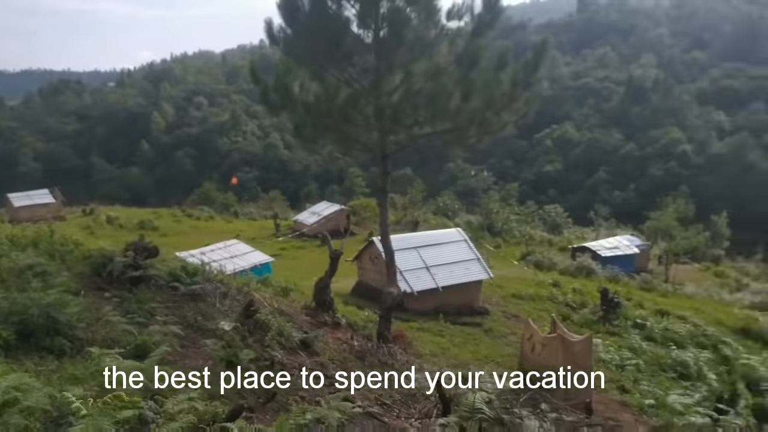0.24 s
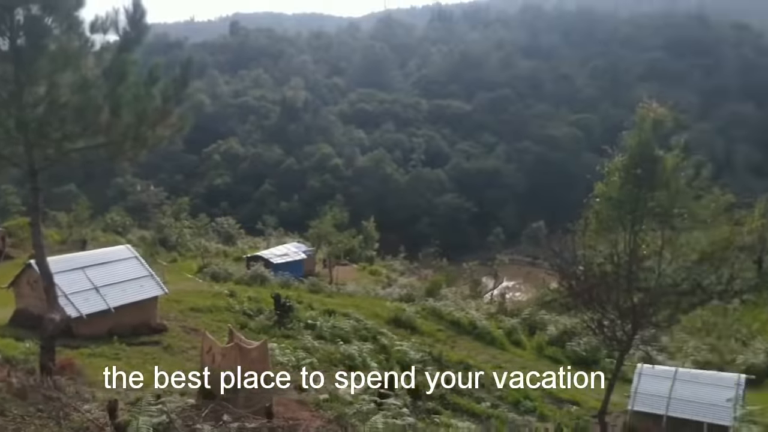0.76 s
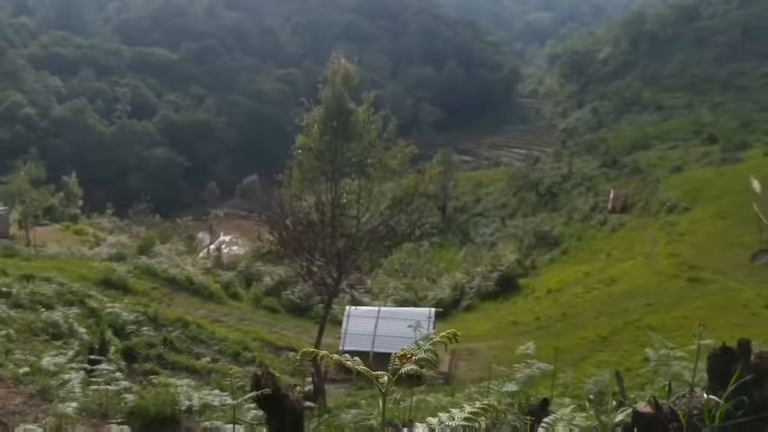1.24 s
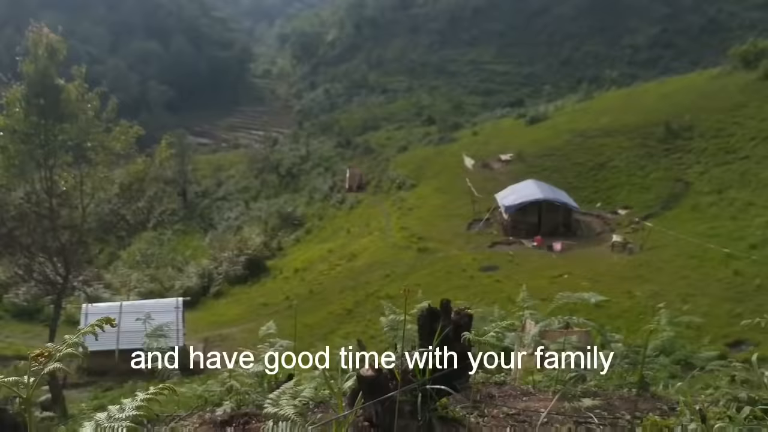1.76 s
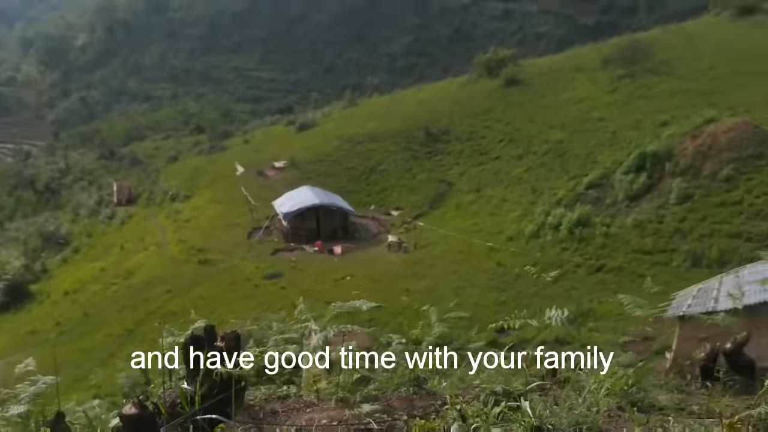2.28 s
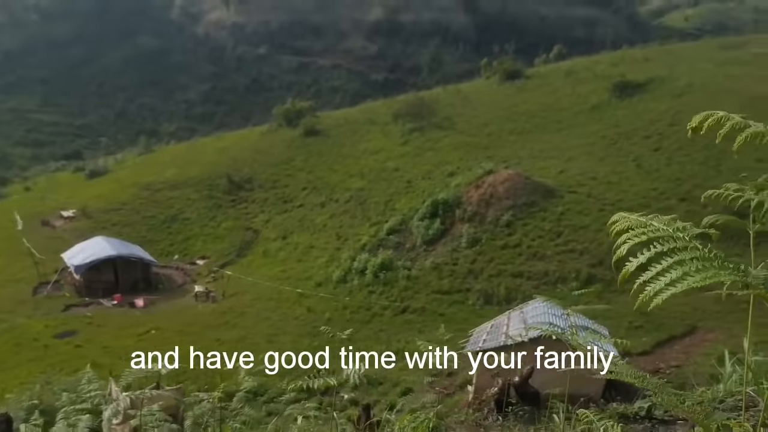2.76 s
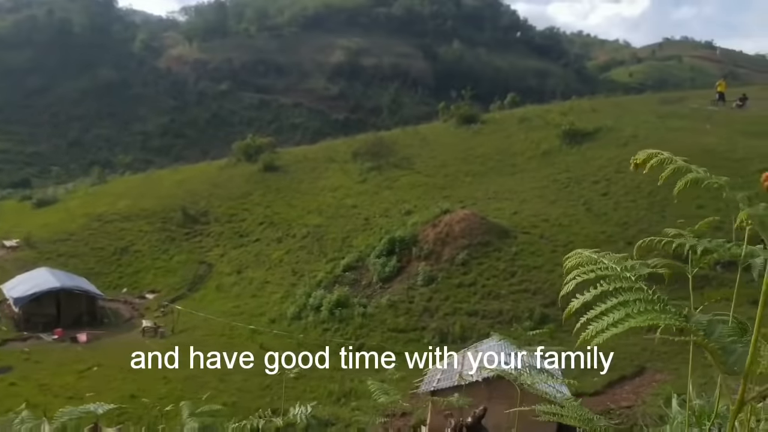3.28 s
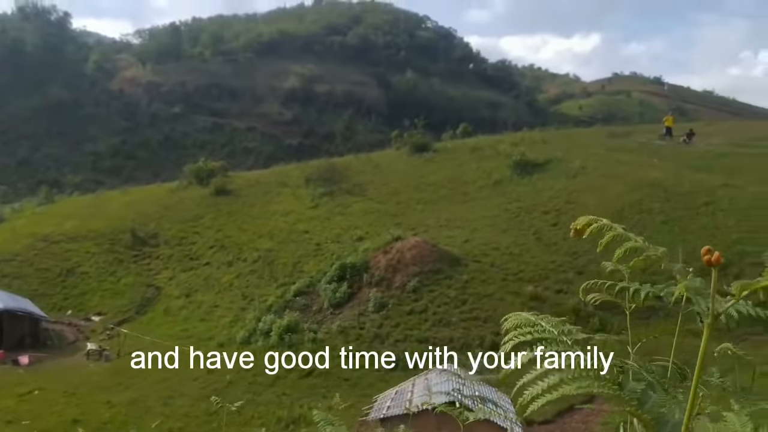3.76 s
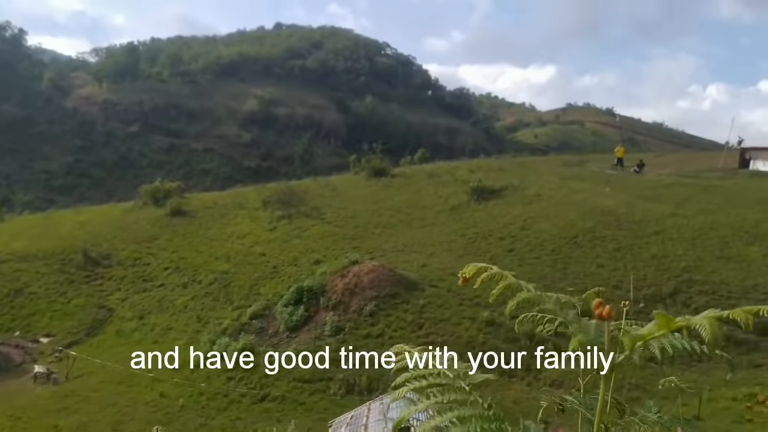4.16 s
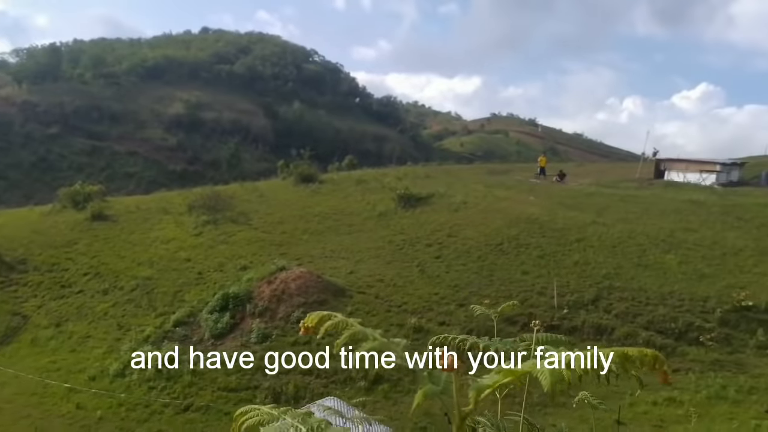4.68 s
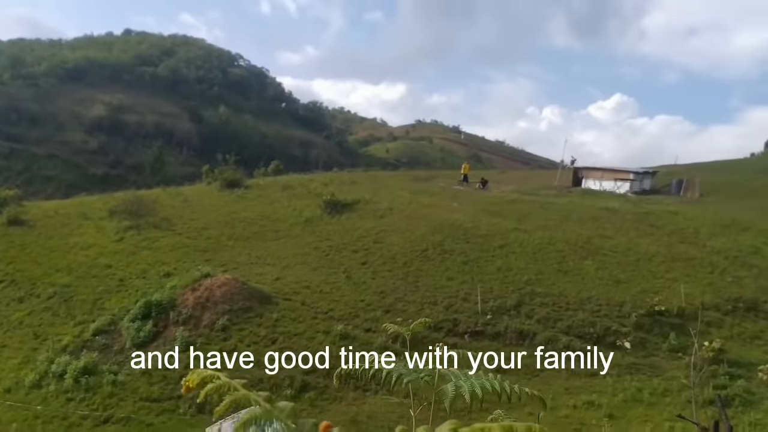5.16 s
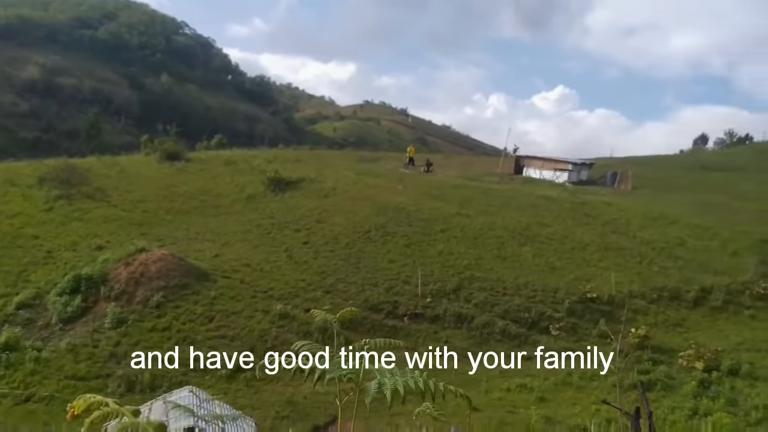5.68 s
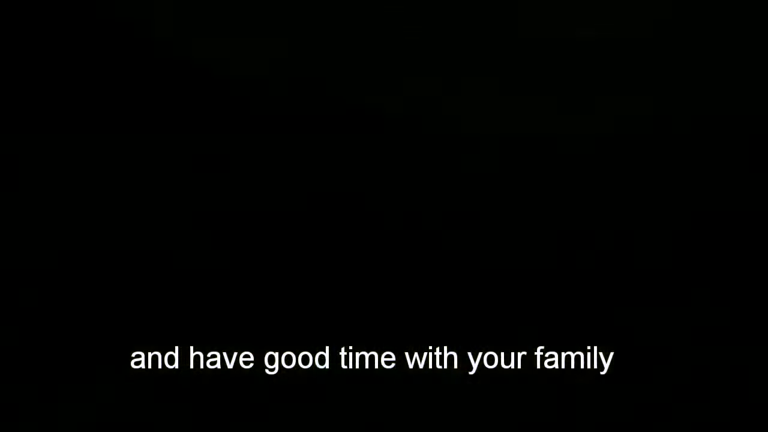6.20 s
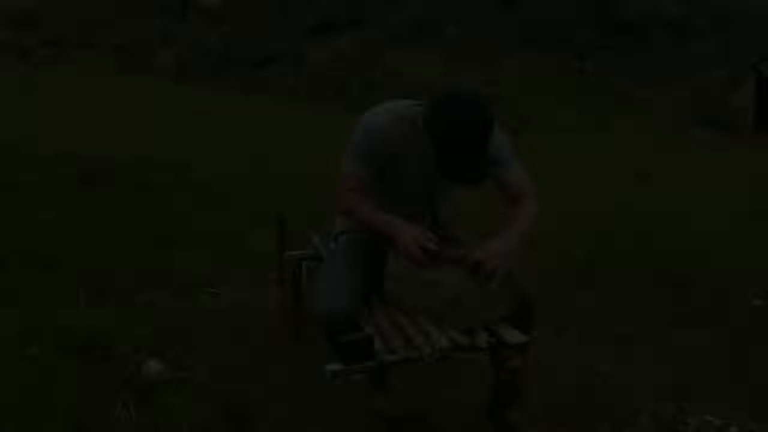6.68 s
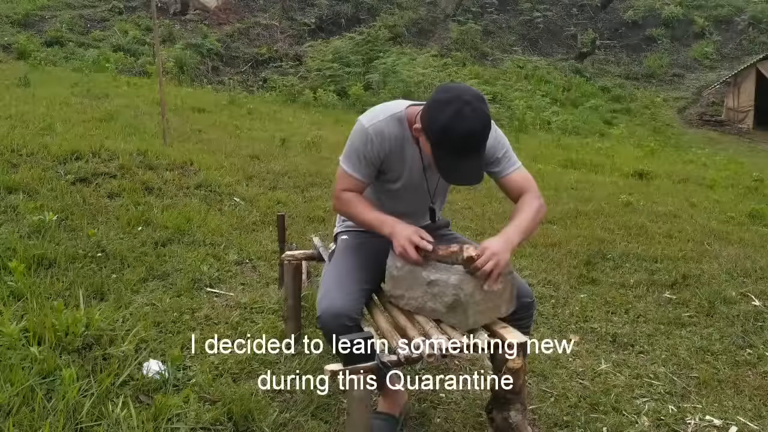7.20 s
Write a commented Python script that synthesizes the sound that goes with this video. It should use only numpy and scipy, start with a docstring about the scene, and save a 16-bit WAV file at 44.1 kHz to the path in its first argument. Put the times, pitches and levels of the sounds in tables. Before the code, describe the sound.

A lively chorus of songbirds in open wooded country, clear short whistles gliding up and down over distant twittering. A near bird repeatedly breaks in with a brief, loud buzzy trill. A soft low cuckoo note comes around five seconds, then a clearer two-note call near six. Light echoes from trees, faint air hiss; a dry tick and low wind rumble at the end.

```python
"""Clear whistles from many songbirds open a dawn chorus in a wood, over a blur of far birds.
A near bird to the right breaks in with a buzzy trill of sliding strokes; a cuckoo calls almost straight ahead.
Whistles are gliding sines, far birds are crowds of short ones, and the trees answer with tails of noise.
Air hiss, a little wind rumble on the microphone and one dry tick are shaped noise.
A crude rate converter misplaces every sample slightly, so tones gain faint mirror tones up and down the spectrum."""
import sys
import numpy as np
from scipy import signal
from scipy.fft import rfft, irfft
from scipy.io import wavfile
from scipy.ndimage import uniform_filter1d, map_coordinates

SR = 44100
rng = np.random.default_rng(int(sys.argv[2]) if len(sys.argv) > 2 else 0)


def output_pcm(signal):
    """Save a mono or channel-first signal as 16-bit PCM at the path in sys.argv[1].

    Samples are clipped to [-1, 1] before scaling.
    """
    pcm = np.clip(np.atleast_2d(signal).T, -1, 1) * 32767
    wavfile.write(sys.argv[1], SR, np.round(pcm).astype(np.int16))


def to_linear_factor(level_db):
    """Convert decibel levels (scalar or array-like) to linear amplitude factors."""
    exponent = np.asarray(level_db, float) / 20
    return 10 ** exponent


N = 328104

# Gusts through the wood. Each row: time in seconds, microphone rumble in dB, leaf hiss in dB over the air's base level.
GUSTS = [(0, -93, -10), (0.302, -86, -9), (.5, -103.5, -3.5), (3.6, -100, -10), (7.1, -98, 0.5),
         (7.2, -69.5, 1.5)]


def rms_one(x):
    """Scale to rms 1."""
    return x / np.sqrt(np.mean(x ** 2) + 1e-20)


def sides(pan_db):
    """Left and right gains for a left-over-right level difference in dB, power kept."""
    ratio = to_linear_factor(np.asarray(pan_db))
    both = np.array([ratio, np.ones_like(ratio)]).reshape(2, -1)
    return np.sqrt(2 / (1 + ratio ** 2)) * both


def slow_chance(rate_hz):
    """Noise through two equal one-pole low-passes: a slow random drift of rms 1."""
    settle = 9000  # samples for the filter to settle
    r = np.exp(-2 * np.pi * rate_hz / SR)
    drift = signal.lfilter([1], [1, -2 * r, r * r], rng.standard_normal(N + settle))
    return rms_one(drift[settle:])


def along(s, values):
    """Straight lines between points in time, one value per sample."""
    return np.interp(np.arange(N) / SR, s, values)


def add_whistle(out, rows, pan_db, fade_s, waver):
    """Add a near-sine whistle along rows of (s, Hz, rms dB): pitch corners rounded, ends faded."""
    s, hz, db = np.transpose(rows)
    first = max(round((s[0] - fade_s) * SR), 0)
    i = np.arange(first, min(round((s[-1] + fade_s) * SR), N))
    pitch = uniform_filter1d(np.interp(i / SR, s, hz), size=400, mode="nearest") * (1 + waver[i])
    to_edge = np.minimum(i / SR - s[0], s[-1] - i / SR)
    fade = np.clip(to_edge / fade_s + 1, 0, 1) ** 2
    level = np.sqrt(2) * to_linear_factor(np.interp(i / SR, s, db)) * fade
    out[:, i] += sides(pan_db) * level * np.sin(2 * np.pi * np.cumsum(pitch) / SR)


def trees(x, t60_s, spread):
    """Scatter from trunks: a dying tail of noise, nearly alike on both channels, of unit power."""
    t = np.arange(round(1.2 * SR)) / SR
    envelope = to_linear_factor(-60 * t / t60_s) * (1 - np.exp(-t / 0.0077))
    mid, side = rng.standard_normal((2, len(t))) * envelope
    tail = mid + spread * side * [[1], [-1]]
    tail = tail / np.sqrt(np.sum(tail ** 2) / 2)
    return signal.fftconvolve(x, tail, axes=1)[:, :N]


def songbirds():
    """Whistles a little unsteady in pitch; moving air and leaves flutter the level, trees smear the faint ones."""
    # Plain whistles on one glide. Each row: start in seconds, length in seconds, level in dB,
    # first pitch in Hz, last pitch in Hz, left over right in dB.
    glides = [(0, 0.15, -48.5, 7000, 6975, -2), (0, 0.031, -49.5, 4815, 4690, 4),
              (0, 0.058, -60, 3083, 3195, 1), (.985, 0.012, -62, 4960, 5350, 0),
              (1.78, 0.13, -53, 2854, 3255, -1), (2.22, 0.13, -57, 3354, 3606, -2),
              (3.785, 0.027, -51, 2960, 2895, -10), (5.505, .02, -62, 5380, 4976, -3),
              (.29, .07, -45, 4983, 4638, -5.5), (.37, 0.081, -48.5, 4796, 4650, -3.5),
              (.44, 0.11, -40.5, 2270, 2160, -4.5), (.51, 0.096, -48.5, 3343, 3287, 4),
              (.56, 0.027, -43, 2626, 2745, 2), (.49, 0.1, -46.5, 2710, 2790, -15),
              (.68, 0.038, -38, 3598, 3660, -4.5), (.84, 0.079, -49, 3280, 3060, 2),
              (1.24, 0.1, -42.5, 2687, 2745, 6.5), (1.34, 0.061, -54, 4237, 3500, 2),
              (1.385, 0.021, -58, 2056, 1740, -9), (1.46, 0.057, -45.5, 2610, 3308, 5),
              (1.52, 0.039, -56, 4100, 3463, 6), (1.67, 0.083, -54.5, 4050, 3340, 1.5),
              (1.72, 0.054, -56.5, 4450, 4060, 5), (1.885, 0.027, -50, 3150, 2780, 6),
              (1.915, 0.16, -62, 5400, 4870, 7.5), (1.96, 0.08, -56.5, 4650, 4285, 2),
              (1.985, .05, -53, 3700, 3270, -4), (2.05, 0.086, -49, 3285, 2730, 3),
              (2.13, 0.1, -47, 3115, 3060, 4), (2.41, 0.1, -54, 2936, 2464, 10),
              (2.44, 0.045, -59, 3520, 3565, -3), (2.76, 0.038, -61.5, 1970, 1786, 3),
              (3.31, 0.066, -56.5, 3387, 3075, 11), (3.315, 0.026, -59.5, 2075, 1595, 5),
              (3.345, 0.03, -68.5, 1630, 1518, 10), (4.3, 0.099, -56.5, 1960, 1950, 5.5),
              (3.41, 0.046, -51, 2865, 3166, -11.5), (3.42, 0.078, -58.5, 2820, 2470, 24),
              (3.65, 0.019, -58, 2090, 1710, 1), (3.73, 0.091, -62, 2770, 3042, 1),
              (4.2, 0.087, -43.5, 1920, 1949, 10), (4.24, 0.013, -53.5, 3900, 3644, 1),
              (4.435, 0.036, -52.5, 3060, 2954, 4), (4.462, 0.04, -38, 2782, 2685, 2.5),
              (4.6, 0.084, -56, 1808, 1720, 17), (4.61, 0.08, -46.5, 2089, 2050, 11),
              (4.65, 0.054, -38, 2142, 2326, 3), (4.74, .16, -48, 2286, 2500, 7),
              (4.81, 0.051, -47, 3277, 2805, -5.5), (5.505, 0.051, -45.5, 2382, 2266, -5.5),
              (5.59, .13, -42, 2140, 2122, -4.5), (5.76, 0.13, -47.5, 2208, 2130, -6.5),
              (5.77, 0.07, -58, 5000, 4894, -2), (5.855, 0.07, -54, 5050, 4890, 0),
              (5.97, 0.029, -82, 4570, 4500, 11), (6.04, 0.12, -56, 2736, 2750, 2),
              (6.166, .03, -45, 2900, 2720, 6), (6.31, 0.096, -52.5, 2294, 2750, 8),
              (6.44, .03, -60, 3150, 3200, -4), (6.58, 0.052, -55.5, 3086, 2920, -7),
              (6.625, 0.036, -47, 2797, 2660, 3), (6.94, 0.098, -59, 1397, 1602, -4),
              (7.125, 0.025, -49.5, 1820, 1580, 4), (6.855, 0.044, -53, 4790, 4714, 1),
              (6.955, 0.037, -54.5, 4820, 4760, -2), (6.41, 0.05, -62, 4993, 4760, 1),
              (6.91, 0.075, -58.5, 4040, 3700, 2), (6.65, 0.1, -59.5, 3514, 3530, -1),
              (6.83, .07, -61, 2730, 2850, 0), (5.49, 0.15, -69.5, 4390, 4460, 4),
              (4.27, 0.11, -64, 3180, 3100, 0), (3.19, 0.016, -61.5, 2980, 2920, 0),
              (7.03, .1, -84, 4700, 4700, 1), (7.005, 0.015, -43.5, 2640, 2400, 6),
              (7.11, 0.11, -50, 3155, 3030, 5), (7.165, 0.079, -50, 2348, 2338, 6.5),
              (7.29, 0.1, -50.5, 2150, 1730, 5), (7.25, 0.053, -52.5, 1550, 1348, -7),
              (7.345, 0.055, -47.5, 4833, 4730, -5)]
    # Rolled whistles, beaded by a fast shake of the pitch. Each row: the same columns as the glides.
    rolls = [(.21, .13, -45.5, 2113, 2090, -2.5), (.22, 0.17, -54, 3950, 3870, 1),
             (.89, .13, -45.5, 3054, 3045, 3), (1.74, 0.21, -47.5, 3426, 3180, 4),
             (3.91, 0.15, -46.5, 1938, 2057, 7), (5.23, 0.35, -47, 1806, 1727, 1.5),
             (6.06, 0.072, -45.5, 2275, 2332, 8), (7.02, 0.12, -58, 1695, 1813, 6.5)]
    # Whistles that bend halfway. Each row: start in seconds, length in seconds, level in dB,
    # first, middle and last pitch in Hz, left over right in dB.
    bends = [(4.129, .08, -38.5, 2225, 2267, 1990, 5), (0.044, 0.037, -51.5, 1505, 1622, 1556, 8),
             (0.131, 0.11, -42, 2110, 2226, 2135, -3.5), (0.148, 0.055, -38.5, 2870, 2645, 2850, 4.5),
             (0.51, 0.0823, -42, 2090, 1840, 2100, 0), (0.594, 0.079, -39, 2870, 3300, 3554, -6.5),
             (1.516, 0.054, -43.5, 2760, 2533, 2680, 4), (2.06, 0.059, -46.5, 2800, 2565, 2680, 7),
             (3.506, 0.023, -61.5, 1890, 2090, 1727, -3), (3.828, 0.0754, -43.5, 2135, 2354, 2060, 6.5),
             (4.843, 0.1, -49.5, 2223, 1790, 1880, 1), (4.902, 0.11, -41.5, 2057, 2284, 1890, 3),
             (4.909, 0.062, -50, 2710, 2940, 2750, -6), (6.198, .11, -45, 1740, 1847, 1954, -2),
             (5.133, 0.103, -65, 2170, 1770, 1890, -2), (6.762, 0.072, -66, 4470, 4540, 4880, -1)]
    # Swell and fade of every whistle. Each row: share of its length, share of its glide, dB added to its level.
    whistle = [(0, 0, -4.5), (0.298, 0.54, 0.5), (.65, .8, -4), (0.999, 1, -4)]
    faint_db, clear_db = -74, -48  # fainter whistles are farther: hardly direct at the first, nearly all at the second

    waver = 0.0066 * slow_chance(72)
    roll_hz = 55 * (1 + slow_chance(10) / 10)
    roll = .035 * np.sin(2 * np.pi * np.cumsum(roll_hz) / SR)
    share, glide, added_db = np.transpose(whistle)
    notes = []
    for table, shake in ((glides, waver), (rolls, waver + roll)):
        for s, long_s, db, first_hz, last_hz, pan_db in table:
            hz = first_hz + (last_hz - first_hz) * glide
            notes.append((s + long_s * share, hz, db, added_db, pan_db, shake))
    steps = np.linspace(0, 1, 9)
    bend_added_db = np.interp(steps, share, added_db)
    for s, long_s, db, *three_hz, pan_db in bends:
        hz = np.polyval(np.polyfit([0, .5, 1], three_hz, 2), steps)  # a parabola through the three pitches
        notes.append((s + long_s * steps, hz, db, bend_added_db, pan_db, waver))

    near, far = np.zeros((2, N)), np.zeros((2, N))
    for s, hz, db, swell_db, pan_db, shake in notes:
        direct = np.clip((db - faint_db) / (clear_db - faint_db), .02, .98)
        for out, power in ((near, direct), (far, 1 - direct)):
            rows = np.transpose([s, hz, db + swell_db + 10 * np.log10(power)])
            add_whistle(out, rows, pan_db, .006, shake)
    smeared = trees(far * to_linear_factor(4.0 * slow_chance(60)), .06, .4)
    return near * to_linear_factor(2.0 * slow_chance(77)) + smeared


def strokes(rows, pan_db, fall_s, drop, low_db, octave_db, open_s):
    """Each stroke of (s, dB, Hz) leaps up to its pitch, loudest there, then slides down; the low part has an octave.
    The slide starts shallow and deepens early in each phrase, at a pace set by open_s."""
    out, began, last = np.zeros((2, N)), 0, 0
    t = np.arange(-round(.008 * SR), round(.02 * SR)) / SR
    depth = np.minimum(np.where(t < 0, (t / 0.00709) ** 2, (t / fall_s) ** 1.077), 1)
    level = np.exp(-(t / .0048) ** 2) + to_linear_factor(low_db) * signal.windows.tukey(len(t), .7)
    for (s, stroke_db, hz), turn in zip(sorted(rows), rng.random((len(rows), 1))):
        if s - last > .05:  # a longer gap starts a new phrase
            began = s
        last = s
        slide = depth * min(0.324 + (s - began) / open_s, 1)
        phase = 2 * np.pi * (np.cumsum(hz * (1.02 - drop * slide)) / SR + turn)
        voice = np.sin(phase) + to_linear_factor(octave_db) * slide ** 2 * np.sin(2 * phase)
        tone = to_linear_factor(stroke_db) * level * voice
        i = np.round((s + t) * SR).astype(int)
        out[:, i[i < N]] += sides(pan_db) * tone[i < N]
    return out


def trill_strokes():
    """Rows of (s, dB, Hz): the strokes of a phrase tend to come ever further apart, none quite like the last."""
    # Trill phrases. Each row: start in seconds, length in seconds, slowing 0-1, base level in dB, base pitch in Hz.
    phrases = [(1.024, 0.16, 0.43, -26, 3590), (2.582, .146, 0.33, -29.5, 3575),
               (3.822, 0.14, 0.13, -30, 3537), (4.952, 0.16, 0.2, -27.5, 3646),
               (5.225, 0.16, 0.6, -39, 3645), (6.176, 0.16, 0.36, -29, 3669)]
    # Swell over a phrase. One value per stroke: level over the phrase's base in dB.
    swell_db = [-16.5, -7.5, -4.5, -2, -1.5, 2.1, -0.9, -1, -12]
    # Rise over a phrase. One value per stroke: pitch as a ratio to the phrase's base.
    climb = [.915, .94, .955, .96, .98, .995, 1.03, 1.04, 1.06]
    # One high stroke thrown into the last phrase. Its values: time in seconds, level in dB, pitch in Hz.
    flick = (6.3, -32.5, 4810)
    uneven_s, uneven_db, uneven_pitch = .001, 1.5, .012  # chance spread from stroke to stroke; pitch as a share
    step, rows = np.linspace(0, 1, len(climb)), [flick]
    for s, long_s, slowing, base_db, hz in phrases:
        late, loud, high = rng.standard_normal((len(step), 3)).T
        times = s + long_s * step * (1 - slowing + slowing * step) + uneven_s * late
        levels = base_db + np.array(swell_db) + uneven_db * loud
        rows += zip(times, levels, hz * (np.array(climb) + uneven_pitch * high))
    return rows


def near_trill():
    """The near bird's buzzy strokes, made hoarse by a fast random flutter of the level."""
    smooth = strokes(trill_strokes(), pan_db=-4.0, fall_s=0.01588, drop=.25, low_db=-3.5, octave_db=-11.0, open_s=0.0634)
    return smooth * to_linear_factor(2.12 * slow_chance(276))


def falling_chips():
    """Short chips of other birds, each a stroke that slides down with hardly any octave."""
    # Chips. Each row: time in seconds, level in dB, pitch near the loudest point in Hz.
    chips = [(4.34, -67, 3100), (4.375, -59, 3140), (7.334, -47.5, 2810), (7.362, -42.5, 2717),
             (7.389, -44, 2670), (7.413, -47, 2590), (7.436, -46, 2570)]
    return strokes(chips, pan_db=2.5, fall_s=.013, drop=.2, low_db=-3.0, octave_db=-36.0, open_s=.01)


def cuckoo():
    """Pure, hollow sine notes almost straight ahead: a short arched one and a long level one."""
    # Calls on the short arch. Each row: start in seconds, level in dB.
    high_calls = [(5.955, -37.5), (7.341, -35.5)]
    # Calls on the long level note. Each row: start in seconds, level in dB.
    low_calls = [(4.95, -51.5), (6.35, -42)]
    # The short arch. Each row: seconds after the start, pitch in Hz, dB added to the level of the call.
    arch = [(0, 543, -19.5), (.022, 646, 2), (0.056, 665, 4), (.078, 576, 1), (.093, 534.5, -37)]
    # The long level note. Each row: seconds after the start, pitch in Hz, dB added to the level of the call.
    level_note = [(0, 512, -10.5), (.035, 505.5, 0), (.1, 514.2, 4), (.175, 510, 3.2), (0.22, 517, -15.5)]
    out = np.zeros((2, N))
    for calls, shape in ((high_calls, arch), (low_calls, level_note)):
        for s, db in calls:
            add_whistle(out, np.array(shape) + [s, 0, db], -1.5, .004, np.zeros(N))
    return out


def flock(low_hz, high_hz, count):
    """Many short gliding notes at chance times and places, most in the middle of the range; rms 1."""
    out = np.zeros((2, N))
    for start, long, place, pitch, pitch_too, glide, loud in rng.random((count, 7)):
        s, long_s = start * N / SR, .005 + .025 * long ** 3
        hz = low_hz * (high_hz / low_hz) ** ((pitch + pitch_too) / 2)
        last_hz = hz * (.85 + .22 * glide)
        rows = [(s, hz, -6.0 * loud), (s + long_s, last_hz, -6.0 * loud - 3.0)]
        add_whistle(out, rows, 2.0 + 6.7 * (place - .5), .006, np.zeros(N))
    return rms_one(out)


def far_birds():
    """Two distant flocks, heard mostly as scatter through the trees."""
    # Far birds before the trees. Each row: time in seconds, low voices in dB, high voices in dB.
    far = [(0, -59, -57), (0.3, -53, -57.5), (1.0, -62.5, -59.5), (1.42, -68.5, -66), (1.52, -74, -47),
           (1.7, -79.5, -57.5), (2.3, -75.5, -56.5), (2.55, -92, -66), (3.001, -83, -60.5),
           (3.6, -87, -77.5), (3.75, -76, -66), (4.4, -55.5, -77), (4.75, -59, -74), (5.18, -53.5, -54),
           (5.55, -65, -65.5), (6.001, -56.5, -65.5), (6.799, -68.5, -58.5), (7.2, -67, -64),
           (7.44, -44, -60)]
    s, low_db, high_db = np.transpose(far)
    low = to_linear_factor(along(s, low_db)) * flock(1607, 2732, count=800)
    high = to_linear_factor(along(s, high_db)) * flock(2300, 4150, count=1500)
    voices = low + high
    return to_linear_factor(-8.0) * voices + trees(voices, .13, .45)


def twig():
    """One dry tick: a burst of noise that dies within a few milliseconds, kept to the middle band."""
    t = np.maximum(np.arange(N) / SR - 7.348, 0)  # seconds since the tick
    tick = to_linear_factor(-32) * (t > 0) * np.exp(-t * SR / 40) * rng.standard_normal(N)
    return signal.sosfilt(signal.butter(2, [600, 5000], "band", fs=SR, output="sos"), tick)


def air():
    """Smooth far hiss of the wood: noise coloured by its spectrum and swelling with the gusts."""
    # Colour of the hiss. Each row: frequency in Hz, relative level in dB.
    spectrum = [(24, -62), (40, -52), (377, -15), (973, -15), (1220, -16), (2920, -8.5), (4800, -18),
                (15500, -36)]
    base_db = -64.5
    mid, side = rng.standard_normal((2, N))
    hz = np.maximum(np.arange(N // 2 + 1) * SR / N, 1)
    point_hz, point_db = np.transpose(spectrum)
    colour = to_linear_factor(np.interp(np.log(hz), np.log(point_hz), point_db))
    hiss = irfft(rfft(mid + 0.32 * side * [[1], [-1]]) * colour, N)
    s, _, hiss_db = np.transpose(GUSTS)
    return to_linear_factor(base_db + along(s, hiss_db)) * rms_one(hiss)


def wind():
    """Lumpy low rumble on the microphone: band-passed noise, partly its own on each channel."""
    mid, side = rng.standard_normal((2, N)) * to_linear_factor(4.0 * slow_chance(9))
    band = signal.butter(2, [30, 140], "band", fs=SR, output="sos")
    rumble = signal.sosfilt(band, mid + .5 * side * [[1], [-1]])
    s, rumble_db, _ = np.transpose(GUSTS)
    return to_linear_factor(along(s, rumble_db)) * rms_one(rumble)


def scene():
    """Near birds come direct, off the nearest branches and through the trees; far birds, air and wind lie under them."""
    song, trill, chips, call = songbirds(), near_trill(), falling_chips(), cuckoo()
    others = song + chips
    branches = trees(to_linear_factor(-6.5) * trill + to_linear_factor(-9.0) * others, .07, .3)
    echoes = trees(to_linear_factor(-15.0) * trill + to_linear_factor(-8.5) * others, 0.47, 0.15)
    call_echo = trees(to_linear_factor(-18.0) * call, 0.29, 0.24)
    birds = others + trill + call + branches + echoes + call_echo
    return birds + far_birds() + twig() + air() + wind()


def top_cut(x):
    """Nothing passes above the cut-off."""
    return signal.sosfilt(signal.butter(12, 15720, fs=SR, output="sos"), x)


def record(dry):
    """Nearest-sample rate conversion reads each sample up to half a step early or late, in a sawtooth."""
    slip_hz = 3872.7  # sawtooth cycles a second, which spaces the mirror tones
    n = np.arange(N)
    miss = ((n * slip_hz / SR) % 1 - .5) / (1 + slip_hz / SR)  # in samples
    read = np.array([map_coordinates(c, [n + miss], order=3, mode="nearest") for c in dry])
    return top_cut(read)


dry = scene()
out = record(dry)
output_pcm(out)
```